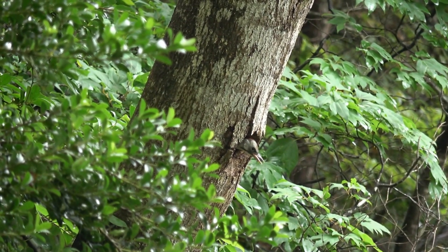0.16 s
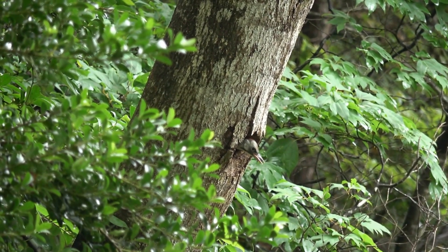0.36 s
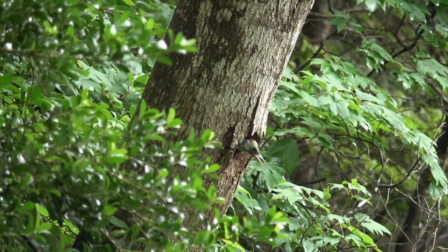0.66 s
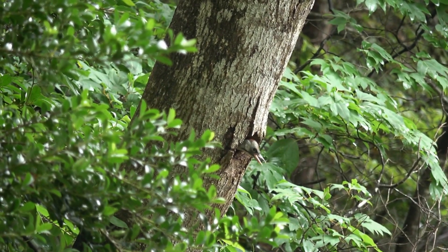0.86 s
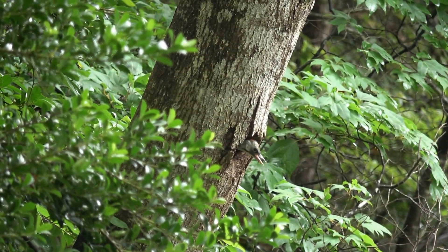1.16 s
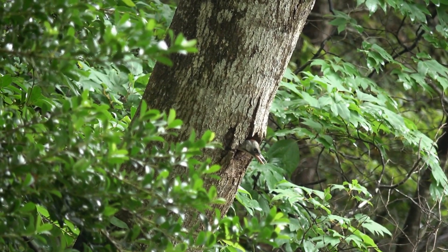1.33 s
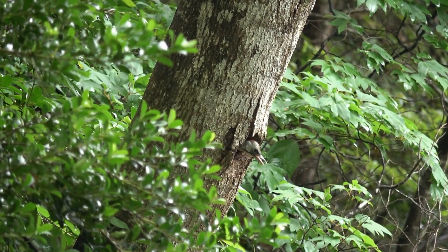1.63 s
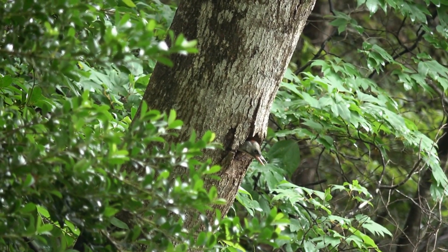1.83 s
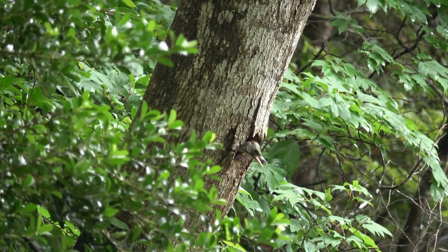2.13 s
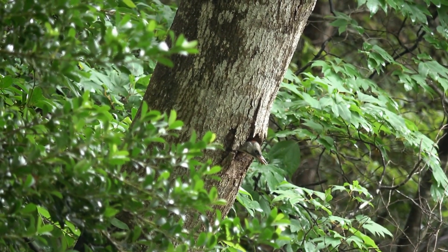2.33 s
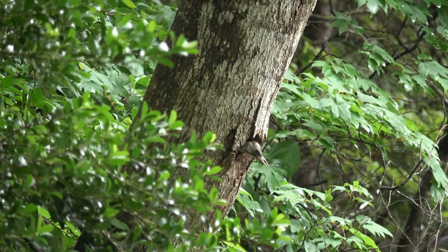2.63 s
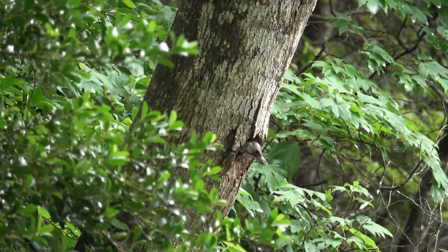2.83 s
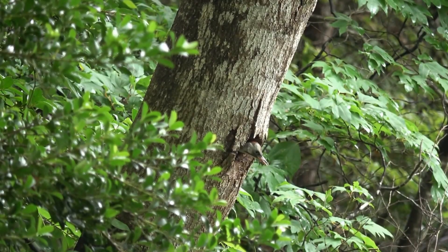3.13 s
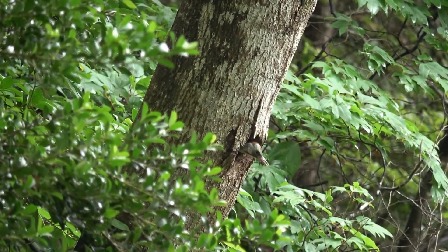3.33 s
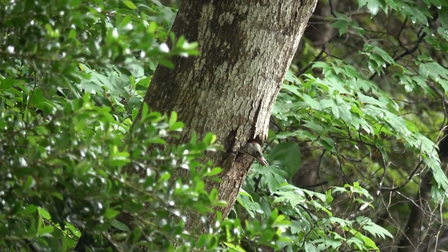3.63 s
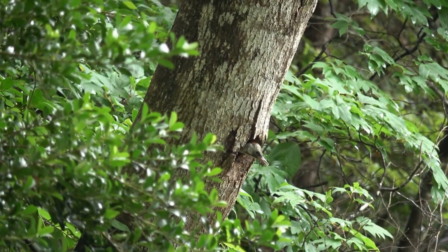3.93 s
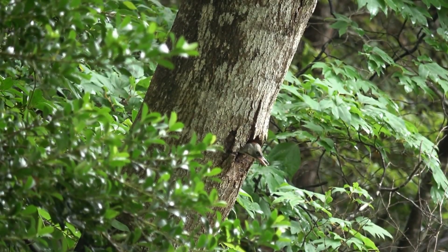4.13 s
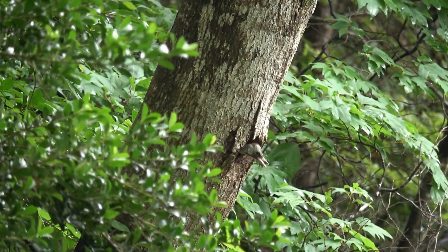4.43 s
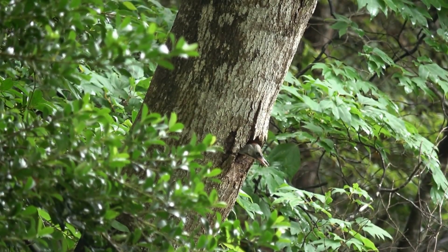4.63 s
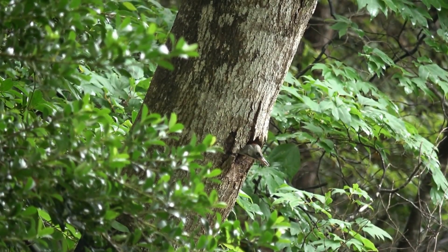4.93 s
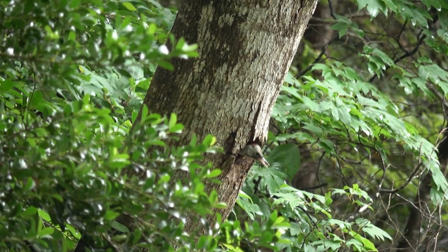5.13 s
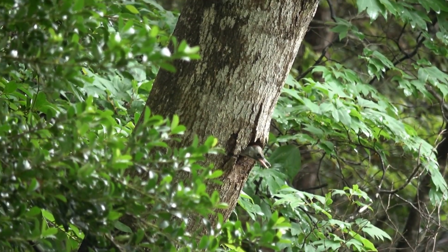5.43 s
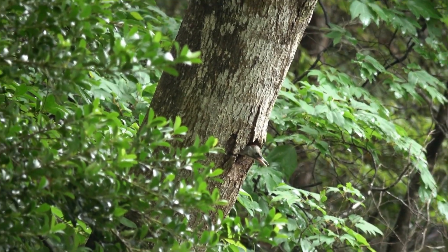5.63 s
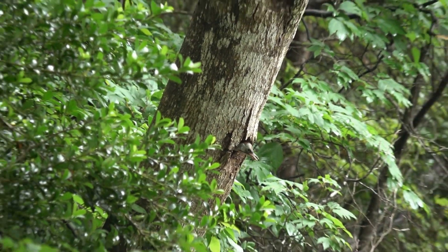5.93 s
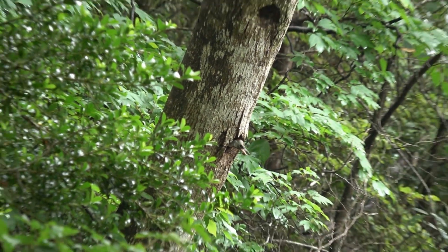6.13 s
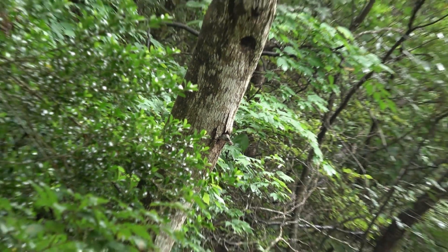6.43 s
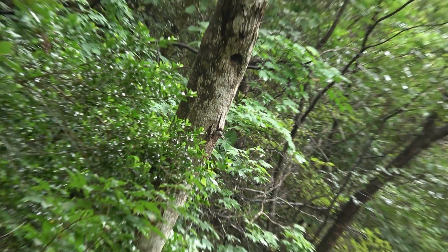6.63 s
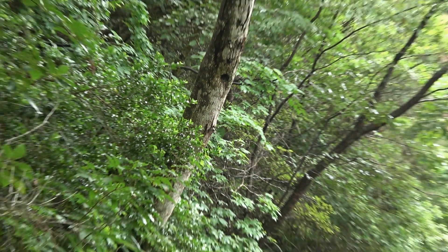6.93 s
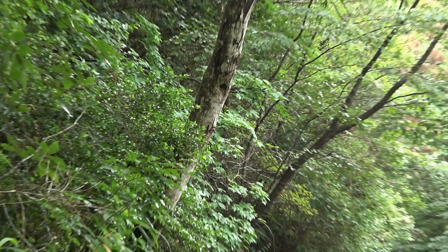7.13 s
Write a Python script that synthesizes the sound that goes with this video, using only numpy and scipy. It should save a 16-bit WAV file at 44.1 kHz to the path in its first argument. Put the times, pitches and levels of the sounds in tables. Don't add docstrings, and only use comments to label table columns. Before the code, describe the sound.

Woodland around a nest tree, heard from a camera microphone a few metres away. Soft leaf hiss continues throughout, with faint low traffic swells, strongest around 3.6 and 5.4 s. From 0.2 s to 7.0 s an adult woodpecker repeats sharp, nasal, slightly ragged notes, each about a twentieth of a second, irregularly spaced from a quarter second to nearly a second apart; trunks and leaves return a short fluttering tail. Quiet, dry rasps of young come from inside the trunk, with rough little cries from 1.9 s, clustering near 4.2 and a louder one at 6.7. Tiny distant peeps are scattered through. A single thin squeak comes at 3.1 s. Dull case knocks fall at 3.3, 4.2 (hardest) and 5.2 s. Low focus-motor whirrs run at 4.2, 5.6 and 6.2 s; a zoom motor rises from 6.4 and hums until 7.2.

```python
import sys
import numpy as np
from scipy import signal
from scipy.fft import rfft, irfft
from scipy.io import wavfile

SR = 44100
rng = np.random.default_rng(int(sys.argv[2]) if len(sys.argv) > 2 else 0)


def volts_from_decibels(level):
    exponent = np.asarray(level, float) / 20
    return 10 ** exponent


def generate_wav(signal):
    frames = np.transpose(np.atleast_2d(signal))
    scaled = np.clip(frames, -1, 1) * 32767
    pcm = np.round(scaled).astype(np.int16)
    wavfile.write(sys.argv[1], SR, pcm)


N = 320607
LEAD = 22050


def rms_one(x):
    return x / np.sqrt(np.mean(x ** 2) + 1e-20)


def at_hz(points, hz):
    points_hz, values = np.transpose(points)
    return np.interp(np.log(hz), np.log(points_hz), values)


def colour(x, points):
    hz = np.maximum(np.fft.rfftfreq(len(x), 1 / SR), 1)
    return irfft(rfft(x) * volts_from_decibels(at_hz(points, hz)), len(x))


def wobble(white, rate_hz):
    return rms_one(signal.sosfilt(signal.butter(2, rate_hz, fs=SR, output="sos"), white))


def resonate(x, modes):
    out = 0
    for k, (hz, width_hz, db) in enumerate(modes):
        r = np.exp(-np.pi * width_hz / SR)
        poles = [1, -2 * r * np.cos(2 * np.pi * hz / SR), r * r]
        out = out + (-1) ** k * volts_from_decibels(db) * signal.lfilter([1 - r * r, 0, r * r - 1], poles, x)
    return out


def add(track, start_s, sound):
    i = round(start_s * SR) + LEAD
    track[i:i + len(sound)] += sound[:len(track) - i]


def glide(rows, partials):
    s, hz, level_db = np.transpose(rows)
    t = np.arange(s[0], s[-1], 1 / SR)
    phase = 2 * np.pi * np.cumsum(np.interp(t, s, hz)) / SR
    course_db = np.interp(t, s, level_db)
    return sum(volts_from_decibels(db + share * course_db) * np.sin(round(k) * phase) for k, db, share in partials)


def background():
    # pitch_hz, density_db (per Hz)
    leaf_spectrum = [(12, -39.5), (20, -4.5), (81, 7.5), (200, -9.5), (328, -13), (527, -5), (802, -6),
                     (1150, 0.5), (1860, -4.5), (3250, -2), (3740, -6.5), (5680, -10), (8650, -24),
                     (12400, -19.5), (14700, -23), (16000, -55)]
    # peak_s, level_db, half_width_s
    passes = [
        (2.6, -68.5, 0.34),
        (3.6, -63.5, 0.58),
        (4.2, -64.5, 0.28),
        (5.35, -62, 0.42),
        (6.4, -67, 0.76),
    ]
    t = np.arange(N) / SR
    hiss, rumble = rng.standard_normal((2, N))
    swell = sum(volts_from_decibels(db) * np.exp(-((t - s) / half_s) ** 2) for s, db, half_s in passes)
    rumble = rms_one(signal.sosfilt(signal.butter(1, [50, 130], "band", fs=SR, output="sos"), rumble))
    breeze = volts_from_decibels(.9 * wobble(rng.standard_normal(N), rate_hz=3.))
    return volts_from_decibels(-55) * breeze * rms_one(colour(hiss, leaf_spectrum)) + swell * rumble


def focus(length_s, start_hz, db, second_db):
    settled_hz = 136
    t = np.arange(round(length_s * SR)) / SR
    kick = (start_hz / settled_hz - 1) * np.exp(-t / .065)
    rebound_s = .06 + .0031 * (start_hz - settled_hz)
    rebound = .095 * np.exp(-((t - rebound_s) / .065) ** 2)
    stopping = np.interp(length_s - t, [0, .1], [.88, 1])
    hz = settled_hz * (1 + kick + rebound) * stopping
    waver_db = 1.8 * wobble(rng.standard_normal((2, SR)), rate_hz=10.0)
    first, second = volts_from_decibels(waver_db)[:, -len(t):]
    phase = 2 * np.pi * np.cumsum(hz) / SR
    tone = volts_from_decibels(16 * kick) * first * np.sin(phase)
    tone = tone + volts_from_decibels(second_db - 38 * kick) * second * np.sin(2 * phase)
    fade_db = -25 * np.exp(-np.minimum(t, (length_s - t) / 3) / .012)
    return volts_from_decibels(db + fade_db) * tone


def camera():
    # start_s, length_s, start_hz, level_db, second_partial_db
    focus_runs = [
        (4.2, .35, 166.5, -62.5, 2),
        (5.61, .44, 208, -55.5, -14),
        (6.24, .46, 200, -62, -9),
    ]
    # time_s, pitch_hz, level_db
    zoom_course = [
        (6.38, 111, -85),
        (6.44, 116, -70),
        (6.7, 149.5, -64),
        (7.15, 150.5, -62),
        (7.2, 151, -74),
    ]
    # start_s, level_db, pitch_hz
    knocks = [
        (3.334, -48, 431),
        (4.168, -38.5, 545),
        (4.192, -49, 248),
        (5.191, -48, 286),
    ]
    out = np.zeros(N + LEAD)
    for start_s, *run in focus_runs:
        add(out, start_s, focus(*run))
    add(out, zoom_course[0][0], glide(zoom_course, [(1, 0, 1), (2, 0, 1)]))
    t = np.arange(round(.04 * SR)) / SR
    for start_s, db, hz in knocks:
        add(out, start_s, volts_from_decibels(db) * np.sin(2 * np.pi * hz * t * (1 - 3.9 * t)) * np.exp(-t / 0.0029))
    return out[LEAD:]


def thin_peeps():
    # start_s, pitch_hz, level_db, length_s
    peeps = [(0.018, 7560, -67, 0.23), (0.165, 5700, -46, 0.042), (0.667, 5700, -49.5, 0.022),
             (1.37, 5600, -56, 0.023), (1.621, 5700, -56, 0.029), (1.987, 4150, -26.5, 0.0049),
             (3.725, 3780, -33, 0.0093), (6.669, 4150, -39, 0.018), (1.033, 3650, -54, 0.064),
             (5.539, 3850, -50, 0.054), (5.57, 4370, -55, 0.057), (4.612, 5690, -50, 0.042),
             (5.632, 5700, -48, 0.034), (6.663, 6970, -46.5, 0.022), (6.666, 2690, -38, 0.037),
             (6.883, 7770, -75, 0.11)]
    out = np.zeros(N + LEAD)
    t = np.arange(round(.15 * SR)) / SR
    for start_s, hz, db, length_s in peeps:
        waver = 1 + .025 * wobble(rng.standard_normal(len(t)), rate_hz=200.)
        phase = 2 * np.pi * np.cumsum(hz * waver) / SR
        swell = np.sin(np.pi * np.minimum(t / length_s, 1))
        add(out, start_s, volts_from_decibels(db) * np.sin(phase) * swell)
    return out


def thin_squeak():
    # time_s, pitch_hz, effort_db
    course = [
        (3.1125, 2470, -70),
        (3.116, 2370, -14),
        (3.124, 2550, -8),
        (3.131, 2486, 2.5),
        (3.135, 2190, -12),
        (3.142, 2100, -13),
        (3.146, 2070, -68),
    ]
    # multiple, level_db, effort_share
    squeak_partials = [(1, -29, 0.12), (2, -24, 1.2), (3, -35.5, 0.91), (4, -42, 1.), (5, -53, 1.)]
    out = np.zeros(N + LEAD)
    add(out, course[0][0], glide(course, squeak_partials))
    return out


def nestling_rasps():
    # start_s, level_db, trunk_share_db, throat_share_db, length_s
    rasps = [(0.028, -63.5, 11, 11, 0.023), (0.189, -46.5, 0, 5, 0.026), (0.636, -55, -4, -3, 0.031),
             (0.669, -51.5, 0, -1, 0.034), (0.9603, -44.5, -3, -5, 0.034), (1.244, -35, -16, -1, 0.022),
             (1.628, -58, 3.5, 7, 0.073), (2.196, -53.5, -12, 1, 0.063), (2.655, -35, -9.5, -1.5, 0.02),
             (2.8005, -49, -5.5, -2, 0.025), (3.052, -60, 2, -2, 0.022), (3.3105, -50, -2, 4, 0.047),
             (3.846, -54, 2.5, 4, 0.057), (3.924, -41, -6, -7, 0.02), (4.033, -47.5, -0.5, -1, 0.019),
             (4.503, -48, -9, 4, 0.025), (4.62, -54, 0, 2, 0.034), (5.259, -44.5, -4.5, 6.5, 0.022),
             (5.504, -48, -21, -5, 0.016), (5.621, -57, 9, 9, 0.049), (5.932, -47.5, -1, -5, 0.033)]
    # pitch_hz, width_hz, level_db
    hole_modes = [(4200, 78, 8.5), (5700, 530, 3.5), (7560, 160, -5.5)]
    trunk_modes = [(568, 54, -0.5), (850, 114, 5.5), (1040, 410, 0.5)]
    throat_modes = [(1910, 490, 6.5), (3000, 340, -3), (3100, 170, -1)]
    out = np.zeros(N + LEAD)
    t = np.arange(round(.12 * SR)) / SR
    for start_s, db, trunk_db, throat_db, length_s in rasps:
        rate_noise, breath = rng.standard_normal((2, len(t)))
        cycles = np.cumsum(620 * (1 - 7.3 * t) * (1 + 0.14 * wobble(rate_noise, rate_hz=610.0))) / SR
        pulses = np.diff(np.floor(cycles), prepend=0) * (1 + 0.38 * breath) + 0.051 * breath
        voice = rms_one(resonate(pulses, hole_modes))
        voice = voice + volts_from_decibels(trunk_db) * rms_one(resonate(pulses, trunk_modes))
        voice = voice + volts_from_decibels(throat_db) * rms_one(resonate(pulses, throat_modes))
        envelope = np.minimum(t / .014, 1) * np.exp(-(t / length_s) ** 2)
        add(out, start_s - .008, volts_from_decibels(db - 4.0) * voice * envelope)
    return out


def calls(rows, kind, throat):
    out = np.zeros(N + LEAD)
    t = np.arange(round(.05 * SR)) / SR
    k = np.arange(1, 20)[:, None]

    def past(s):
        return np.maximum(t - s, 0)

    climb = np.interp(t, [0, 0.01042], [kind["start_share"], 1])
    bend = climb - kind["sag_per_s"] * past(kind["sag_after_s"])
    doubled = t / kind["doubles_by_s"]
    doubling_db = np.interp(doubled, [.25, 1], [-44, kind["doubled_db"]])
    even_db = -1.5 * np.clip(doubled - .5, 0, 1)
    low_db = -kind["low_loss_db_per_s"] * past(kind["low_hold_s"])
    upper_db = kind["upper_db"] - kind["upper_loss_db_per_s"] * past(kind["upper_hold_s"])
    envelope = np.clip(np.minimum(t / kind["attack_s"], (kind["length_s"] - t) / .002), 0, 1) ** 2
    opening_db = -18 * np.exp(-t / .003)
    for start_s, db, hz, rough, odd_db in rows:
        pitch_noise, *breath_noise = rng.standard_normal((20, len(t)))
        ragged = rough * np.minimum(t / 0.0058, 1)
        pitch = hz * bend * (1 + .07 * ragged * wobble(pitch_noise, rate_hz=500.))
        high = k * hz > 3700
        partial_db = at_hz(throat, k * pitch) + np.where(k % 2, doubling_db + odd_db, even_db)
        partial_db = partial_db + (kind["bright_db"] + opening_db) * high + np.where(k > 2, upper_db, low_db)
        breath = 1 + ragged * (.6 + 1.2 * high) * wobble(np.array(breath_noise), rate_hz=350.)
        waves = np.sin(k * 2 * np.pi * np.cumsum(pitch) / SR + .3 * k * k)
        tone = np.sum(volts_from_decibels(partial_db) * breath * (k * hz < 17000) * waves, axis=0)
        add(out, start_s, volts_from_decibels(db - 3.0) * tone * envelope)
    return out


def nestling_cries():
    # start_s, level_db, pitch_hz, roughness (0-1), period_doubling_db
    cry_rows = [
        (1.897, -38, 1194, 0.95, 0.012),
        (2.271, -40, 912, 0.84, 0.0094),
        (4.163, -43, 952, 0.84, 0),
        (4.208, -37.5, 901, 0.72, 0),
        (5.95, -47, 1018, 0.88, 0),
        (4.897, -41.5, 866, 1, 0),
        (6.252, -40.5, 1104, 0.64, 0),
        (6.682, -35.5, 1423, 0.45, 0),
        (6.686, -43.5, 760, 0.56, 0),
    ]
    cry_kind = dict(length_s=0.0354, attack_s=0.0031, start_share=1.02, sag_after_s=0.0048, sag_per_s=12.5, doubles_by_s=.0001, doubled_db=-0.5, low_hold_s=0.0034, low_loss_db_per_s=600., upper_db=0.5, upper_hold_s=0.0092, upper_loss_db_per_s=1250., bright_db=1.24)
    # pitch_hz, level_db
    young_throat = [(500, -12.5), (1000, -2.5), (1800, 4), (2700, 3.5), (3500, -13), (4400, -1.5),
                    (5700, -1.5), (7000, -8), (9000, -21.5), (15000, -25)]
    # delay_s, level_db
    facing_trunk = (.023, -3)
    cries = calls(cry_rows, cry_kind, young_throat)
    delay_s, db = facing_trunk
    return cries + volts_from_decibels(db) * np.roll(cries, round(delay_s * SR))


def adult_alarm():
    # start_s, level_db, pitch_hz, roughness (0-1), period_doubling_db
    level_notes = [
        (-.25, -15, 809, .2, -17),
        (.2135, -19, 832.3, 0.25, 1.5),
        (.826, -19.5, 839, 0.31, -0.5),
        (1.789, -20, 838.6, 0.27, -2),
        (3.5235, -19.5, 822, 0.09, -0.5),
        (4.116, -17.5, 839, 0.23, 0),
        (4.669, -21.5, 807.3, 0.27, -0.5),
        (5.068, -18, 833, 0.28, -1.5),
        (6.442, -21, 831, 0.08, -2),
        (7.043, -18, 829, 0.24, -3.5),
    ]
    swept_notes = [
        (1.102, -18.5, 830.4, 0.48, -8),
        (2.52, -17, 850, .26, -4.5),
        (2.856, -17, 853.4, 0.38, -9),
        (5.277, -17.5, 838.4, 0.61, -10.5),
        (5.996, -24, 850, 0.34, -5),
    ]
    sharp_notes = [
        (1.322, -19.5, 850, 0.66, -1),
        (1.988, -16, 850, .3, -6),
        (3.73, -16.5, 850, .63, -5.5),
        (4.388, -16, 829, 0.17, 0.5),
        (.391, -19.5, 862, 0.27, 4),
        (5.696, -20.5, 850, 0.26, 5),
    ]
    level_kind = dict(length_s=0.046, attack_s=0.001882, start_share=.89, sag_after_s=.023, sag_per_s=18.2, doubles_by_s=0.0072, doubled_db=2, low_hold_s=0.023, low_loss_db_per_s=900., upper_db=.5, upper_hold_s=0.025, upper_loss_db_per_s=2200., bright_db=-3.35)
    swept_kind = dict(length_s=0.047, attack_s=0.0034, start_share=.91, sag_after_s=.014, sag_per_s=12., doubles_by_s=0.0092, doubled_db=4.5, low_hold_s=0.0085, low_loss_db_per_s=152, upper_db=3., upper_hold_s=.012, upper_loss_db_per_s=516, bright_db=-2)
    sharp_kind = dict(length_s=0.06, attack_s=.003, start_share=.9, sag_after_s=.014, sag_per_s=13, doubles_by_s=.009, doubled_db=0.5, low_hold_s=0.016, low_loss_db_per_s=400., upper_db=3., upper_hold_s=.011, upper_loss_db_per_s=1200., bright_db=-2.9)
    # pitch_hz, level_db
    adult_throat = [(800, -35.5), (1200, -18.5), (1650, -8), (2500, -3), (3300, 0), (4100, -16.5),
                    (5000, -13.5), (5800, -10), (6700, -14.5), (8300, -16), (10000, -26.5), (12000, -24.5),
                    (16000, -39)]
    kinds = [(level_notes, level_kind), (swept_notes, swept_kind), (sharp_notes, sharp_kind)]
    return [calls(rows[turn::2], kind, adult_throat) for rows, kind in kinds for turn in (0, 1)]


def scatter(count):
    # pitch_hz, t60_s
    decay_times = [(500, 0.35), (1500, 0.56), (3000, 0.51), (6000, 0.58), (10000, 0.67), (15000, 0.46)]
    t = np.arange(round(.8 * SR)) / SR
    white = rng.standard_normal((2, count, len(t)))
    out = 0
    band_hz = 300 * 2 ** np.arange(0, 6.1, .5)
    for k, (low, high) in enumerate(zip(band_hz, band_hz[1:])):
        band_filter = signal.butter(2, [low, high], "band", fs=SR, output="sos")
        band = signal.sosfilt(band_filter, white[k % 2])
        out = out + band * volts_from_decibels(-60 * t / at_hz(decay_times, np.sqrt(low * high)))
    clumps = volts_from_decibels(2.33 * wobble(rng.standard_normal((count, len(t))), rate_hz=160.0))
    near = 1 + 0.76 * np.exp(-t / 0.048)
    return out * clumps * near * np.minimum(t / 0.0017, 1)


def scene():
    # delay_s, level_db
    trunk_echoes = [(.013, -23), (.024, -13), (.044, -13)]
    # pitch_hz, level_db
    leaf_colour = [(500, -10), (1700, -11), (2400, -3), (3000, 0), (6000, 0), (12000, -1)]
    # pitch_hz, side_db
    side_spectrum = [(30, -24), (125, -14.5), (300, -5), (700, -17), (2500, -23), (4500, -21.5),
                     (6000, -7.5), (10000, -1.5), (11500, -15), (12500, -30)]
    voices = adult_alarm()
    voices += [thin_squeak() + thin_peeps(), nestling_rasps() + nestling_cries()]
    voices = signal.sosfilt(signal.butter(3, 430, "high", fs=SR, output="sos"), voices)
    aside, *answers = scatter(count=9)
    heard = 0
    for voice, answer in zip(voices, answers):
        path = volts_from_decibels(-35) * answer
        for delay_s, db in trunk_echoes:
            path[round(delay_s * rng.uniform(.93, 1.07) * SR)] += volts_from_decibels(db)
        path = colour(path, leaf_colour)
        path[0] = 1
        heard = heard + signal.fftconvolve(voice, path)[LEAD:LEAD + N]
    beside = signal.fftconvolve(np.sum(voices, axis=0), aside)[LEAD:LEAD + N]
    mid = heard + background() + camera()
    side = colour(volts_from_decibels(-37) * beside + background() + .25 * heard, side_spectrum)
    return np.array([mid + side, mid - side])


def top_cut(x):
    return signal.sosfilt(signal.butter(12, 16810, fs=SR, output="sos"), x)


def record(dry):
    mix = signal.sosfilt(signal.cheby2(10, 60, 17200, fs=SR, output="sos"), dry)
    return top_cut(mix)


dry = scene()
out = record(dry)
generate_wav(out)
```